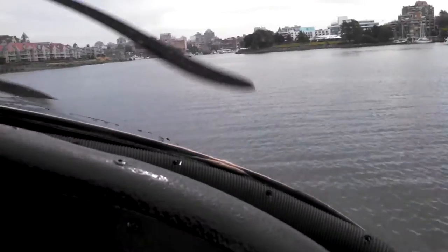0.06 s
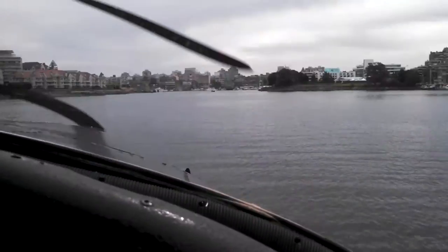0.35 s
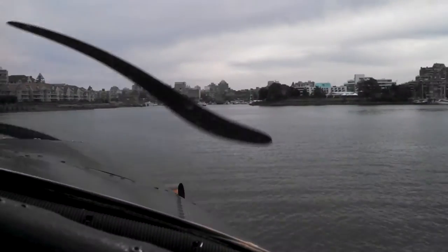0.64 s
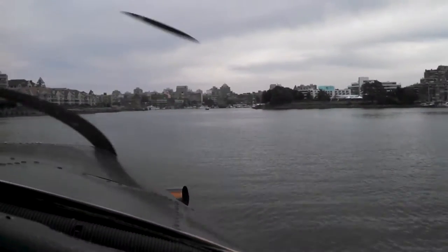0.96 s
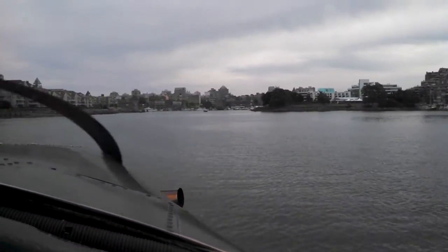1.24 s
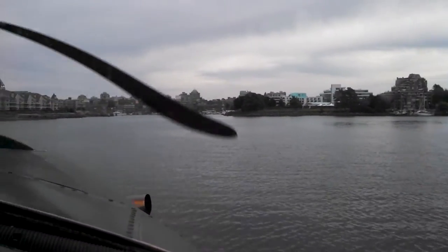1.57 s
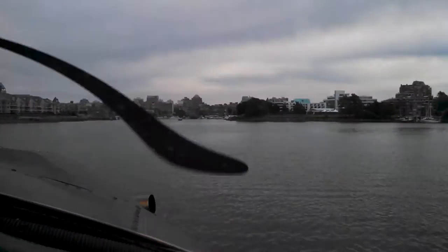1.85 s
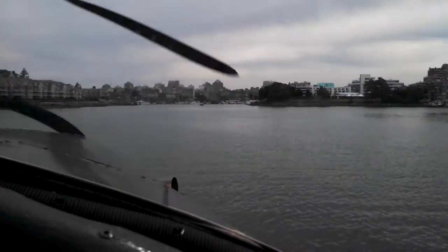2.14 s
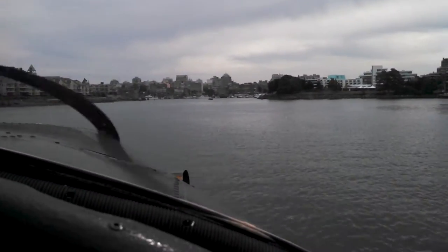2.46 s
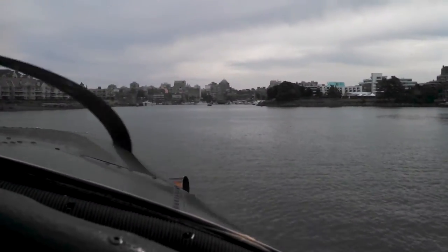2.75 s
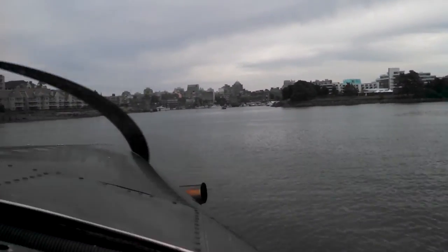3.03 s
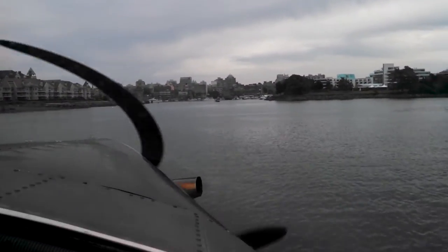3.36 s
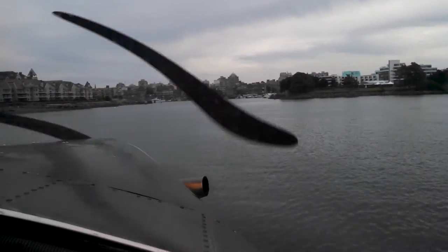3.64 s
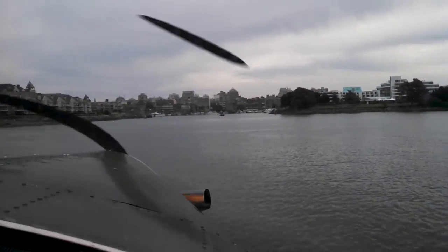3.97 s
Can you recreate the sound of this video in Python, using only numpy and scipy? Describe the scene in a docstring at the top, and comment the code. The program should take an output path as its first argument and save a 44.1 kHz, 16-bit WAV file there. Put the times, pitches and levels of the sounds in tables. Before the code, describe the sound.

A floatplane's turboprop engine drones for the whole four seconds, heard inside the cabin as a rumbling, hissing rush of air over a steady propeller hum. A high turbine whine swells and fades, sinking slightly in pitch, mostly in the first two seconds, while a lower whine slides down throughout. Thin gear tones and a faint whistle hold their pitch, with one high ring strongest just after 3 seconds.

```python
"""Inside the cabin of a turboprop floatplane taxiing on calm water.
Propeller wash rumbles on the hull, roars in the cabin and hisses past the windscreen. The governed
propeller holds its speed, so blades and gears keep their pitch, as does an instrument supply's whistle.
The turbine hums and whines as it sinks towards idle, and an accessory runs down with it.
A hand-held camera widens the picture from its two close microphone ports."""
import sys
import numpy as np
from scipy.fft import rfft, irfft, next_fast_len
from scipy.io import wavfile
from scipy.ndimage import map_coordinates

SR = 44100
rng = np.random.default_rng(int(sys.argv[2]) if len(sys.argv) > 2 else 0)


def wrap_up_sound(samples):
    """Save the sound to the file named by the first command line argument, as 16-bit audio."""
    columns = np.atleast_2d(samples).T
    # keep every value between -1 and 1, then stretch to whole-number steps
    tamed = np.clip(columns, -1, 1)
    steps = np.round(tamed * 32767).astype(np.int16)
    wavfile.write(sys.argv[1], SR, steps)


N = 176400


def amp(db):
    """Decibels to gain."""
    return 10 ** (np.asarray(db) / 20)


def unit(x):
    """x scaled to rms 1."""
    return x / np.sqrt(np.mean(x ** 2) + 1e-20)


def along(points, hz):
    """(Hz, value) points interpolated on a log frequency axis."""
    point_hz, values = np.transpose(points)
    return np.interp(np.log(hz + 1), np.log(point_hz + 1), values)


def curves(rows):
    """One value per sample for each column after the time."""
    time_s, *columns = np.transpose(rows)
    return [np.interp(np.arange(N) / SR, time_s, column) for column in columns]


def wobble(rate_hz):
    """Smooth random curve, rate_hz knots a second."""
    knots = rng.standard_normal(400)
    grid = np.arange(0, N + 64, 64)
    spline = map_coordinates(knots, [grid * rate_hz / SR], mode="wrap")
    return np.interp(np.arange(N), grid, spline)


def filtered(x, response):
    """x through a frequency response, given as a function of Hz."""
    size = next_fast_len(N + SR // 4)
    return irfft(rfft(x, size) * response(np.fft.rfftfreq(size, 1 / SR)), size)[..., :N]


def turning(hz):
    """Phase in radians of a rotation at hz."""
    return 2 * np.pi * np.cumsum(hz * np.ones(N)) / SR


def tone(hz, db, pan_db, flutter, flutter_hz=22, port_lag_s=.00008):
    """Sine fluttering independently at each port; rms db at the louder one, pan_db left over right."""
    ports = []
    for sign in (1, -1):
        phase = turning(hz) + sign * np.pi * hz * port_lag_s
        scatter = wobble(flutter_hz) * np.sin(phase) + wobble(flutter_hz) * np.cos(phase)
        ports.append(amp(min(sign * pan_db, 0)) * unit(np.sin(phase) + flutter * scatter))
    return amp(db) * np.array(ports)


# Wash spectrum. Each row: frequency in Hz, relative density in dB.
WASH_SPECTRUM_DB = [(25, -31), (36, -17), (50, -4.5), (82, -1.5), (100, -1.5), (125, 3.5), (150, -4),
                    (175, -3.5), (200, 2.5), (222, -5), (245, -3.5), (272, -6), (300, -2), (370, -6.5),
                    (500, -4.5), (590, -11.5), (700, -13), (800, -16), (1050, -18), (1300, -17),
                    (1500, -18.5), (1850, -24), (2100, -23.5), (2500, -26), (3050, -23.5), (3500, -27),
                    (4600, -29.5), (5800, -29.5), (6600, -31.5), (7600, -29), (9000, -28.5), (10000, -35.5),
                    (12000, -35.5), (13700, -29.5), (15400, -30.5)]
# Likeness of the two ports. Each row: frequency in Hz, correlation (clipped to -1..1 in use).
PORT_LIKENESS = [(40, 0.8), (130, 0.77), (300, 0.4), (800, 1.06), (1400, -1), (2000, 0), (15000, 0)]
# Port balance. Each row: frequency in Hz, left over right in dB.
PORT_BALANCE_DB = [(50, 4.5), (120, -1), (500, -2), (800, -1), (1400, 0.5), (2200, 2.5), (4800, 1.5),
                   (6200, 4), (10300, 5), (11700, 3), (13100, -5), (15000, -10)]
# Bass phase shift from cabin standing waves. Each row: frequency in Hz, left lead in radians.
PORT_LEAD_RAD = [(40, -1.8), (65, -1.9), (90, -0.42), (150, -0.84), (240, -0.27), (300, -0.022),
                 (450, 0.012)]


def wash_band(lo_hz, hi_hz):
    """One band of turbulent air noise, partly alike at the two ports, rms 1."""
    def mid_side_gains(hz):
        angle = np.arccos(np.clip(along(PORT_LIKENESS, hz), -1, 1)) / 2
        rolloff = np.sqrt((1 + (lo_hz / (hz + 1)) ** 8) * (1 + (hz / hi_hz) ** 8))
        gain = amp(along(WASH_SPECTRUM_DB, hz)) / rolloff * (hz < TOP_HZ)
        return gain * np.array([np.cos(angle), np.sin(angle)])

    def port_gains(hz):
        left = amp(along(PORT_BALANCE_DB, hz))
        right = np.exp(-1j * along(PORT_LEAD_RAD, hz))
        return np.array([left, right]) / np.hypot(left, 1)

    mid, side = filtered(rng.standard_normal((2, N)), mid_side_gains)
    return unit(filtered(np.array([mid + side, mid - side]), port_gains))


# Envelopes of the three wash bands. Each row: time in seconds, relative level in dB.
RUMBLE_DB = [(0.0, -33), (0.07, -21.5), (0.22, -32), (0.33, -23), (0.43, -28.5), (0.93, -28), (1.02, -32.5),
             (1.1, -25.5), (1.36, -28.5), (1.47, -25), (1.88, -30), (2.0, -23), (2.06, -30), (2.35, -28),
             (2.37, -26), (2.54, -30.5), (2.63, -27), (2.77, -31.5), (3.03, -25), (3.42, -29), (3.44, -24),
             (3.79, -31.5), (3.94, -26)]
ROAR_DB = [(0.0, -38), (0.03, -20.5), (0.08, -32.5), (0.6, -32), (0.63, -26), (0.85, -28.5), (1.17, -27),
           (1.27, -30.5), (1.5, -27.5), (2.72, -29), (3.16, -26.5), (3.38, -30.5), (3.44, -25.5),
           (3.53, -34.5), (3.62, -27), (4.0, -29.5)]
HISS_DB = [(0.0, -34), (0.21, -39.5), (0.33, -37), (0.51, -37.5), (0.78, -34.5), (0.8, -38), (1.09, -35.5),
           (1.48, -34.5), (1.67, -36), (2.78, -36), (2.94, -34), (3.23, -33.5), (3.3, -37), (3.43, -34),
           (3.58, -36), (4.0, -35)]
BLADE_PASS_HZ = 73.57


def wash(roar_from_hz=250, hiss_from_hz=622, chop_depth=.025):
    """Churned air: rumble on the hull, roar in the cabin, hiss chopped lightly by the blades."""
    rumble = amp(curves(RUMBLE_DB)[0] + 1.5) * wash_band(20, roar_from_hz)
    roar = amp(curves(ROAR_DB)[0] + .5) * wash_band(roar_from_hz, hiss_from_hz)
    flicker_db = .74 * wobble(24.95)
    hiss = amp(curves(HISS_DB)[0] + 6 + flicker_db) * wash_band(hiss_from_hz, SR)
    chop = 1 + chop_depth * np.sin(turning(BLADE_PASS_HZ))
    return rumble + roar + hiss * chop


# Propeller harmonics. Each row: multiple of the blade rate, level in dB.
PROPELLER_HARMONICS = [(6, -43), (7, -41), (10, -43), (12, -44.5), (13, -48), (14, -50)]


def propeller():
    """Passing blades drone at harmonics held steady by the governed speed."""
    hz = BLADE_PASS_HZ * (1 + .00044 * wobble(3.32))
    return sum(tone(multiple * hz, db, pan_db=-6, flutter=.6, flutter_hz=5)
               for multiple, db in PROPELLER_HARMONICS)


# Gearbox lines. Each row: frequency in Hz, base level in dB.
GEARBOX_LINES = [(1965, -48), (2060, -42.5), (2144, -50), (2574.8, -41.5)]
# Their envelope. Each row: time in seconds, gain in dB.
GEARBOX_GAIN_DB = [(0, -6), (1, -2), (1.5, 1), (2, -1.5), (2.9, -.5), (3.3, -6), (4, -5)]


def gearbox():
    """The reduction gearbox sings at pitches fixed by the propeller speed."""
    gain_db, = curves(GEARBOX_GAIN_DB)
    return sum(tone(hz, db + gain_db, pan_db=-16, flutter=.2, flutter_hz=8) for hz, db in GEARBOX_LINES)


# Supply harmonics. Each row: multiple of the pitch, relative level in dB.
SUPPLY_HARMONICS = [(1, 0), (2, 0), (4, -6), (5, -11)]
# Their envelope. Each row: time in seconds, level in dB.
SUPPLY_DB = [(0, -53), (.45, -53), (.6, -46), (1.1, -42.5), (1.5, -47), (2, -53), (2.85, -51), (3.15, -39),
             (3.4, -43), (4, -42.5)]


def instrument_supply(pitch_hz=1000.4):
    """The instrument supply whistles at constant pitch."""
    level_db, = curves(SUPPLY_DB)
    return sum(tone(multiple * pitch_hz, level_db + db, pan_db=-17, flutter=.25, flutter_hz=8)
               for multiple, db in SUPPLY_HARMONICS)


# Accessory whine. Each row: time in seconds, pitch in Hz, level in dB.
ACCESSORY_RUNDOWN = [(0, 1630, -41), (.33, 1599, -41.5), (.62, 1572, -51), (.85, 1551, -43.5),
                     (1.1, 1528, -43), (1.33, 1506, -48), (1.52, 1492, -37.5), (1.64, 1484, -43),
                     (1.85, 1470, -44), (2.15, 1451, -49), (2.36, 1442, -39), (2.6, 1429, -47),
                     (3.1, 1408, -44), (3.38, 1395, -51), (3.6, 1386, -36.5), (3.9, 1379, -35),
                     (4, 1376, -44)]
# Its mesh tone. Each row: time in seconds, level in dB.
MESH_DB = [(0, -60), (1.5, -46.5), (1.9, -48), (2.6, -55)]


def accessory(mesh_ratio=3.9, jitter_hz=3.5):
    """An engine accessory runs down: a falling whine, with its gear mesh tone above."""
    hz, db = curves(ACCESSORY_RUNDOWN)
    hz = hz + jitter_hz * wobble(70)
    whine = tone(hz, db, pan_db=-3.5, flutter=.33, flutter_hz=45)
    mesh = tone(mesh_ratio * hz, curves(MESH_DB)[0], pan_db=22, flutter=1)
    return whine + mesh


# Gear tone and sidebands. Each row: frequency in Hz, relative level in dB.
GEAR_PARTIALS = [(2901.6, -14), (2986, 0), (3089.4, -15)]
# Their envelope. Each row: time in seconds, level in dB.
GEAR_DB = [(0, -35.5), (.57, -41.5), (1.1, -34.5), (1.5, -34.5), (2.2, -38.5), (2.85, -37), (3, -30),
           (3.2, -27), (3.4, -32), (3.7, -33.5), (4, -39)]


def ringing_gear():
    """A gear rings at one pitch between two weaker sidebands."""
    level_db, = curves(GEAR_DB)
    return sum(tone(hz, level_db + db, pan_db=-22, flutter=.12) for hz, db in GEAR_PARTIALS)


# Turbine shaft speed. Each row: time in seconds, rotation rate in Hz.
SHAFT_HZ = [(0, 733), (.35, 717), (.6, 706.5), (1.1, 689), (1.6, 677.2), (2.1, 672), (2.9, 668.5),
            (4, 666.5)]
# Envelopes of shaft hum and blade whine. Each row: time in seconds, level in dB.
HUM_DB = [(0, -46), (.6, -41), (1.05, -33.5), (1.35, -38), (2, -34.5), (2.7, -35.5), (3.17, -31),
          (3.65, -37), (4, -35)]
WHINE_DB = [(0, -39), (.3, -42), (.78, -34), (1.07, -43), (1.32, -42), (1.4, -35), (1.53, -29), (1.68, -37),
            (1.85, -30.5), (2.07, -28), (2.25, -36), (2.45, -41), (2.6, -34), (2.97, -31), (3.2, -37),
            (3.4, -32), (3.62, -34.5), (3.87, -43), (4, -37)]


def turbine(whine_order=8, jitter=.0004, overtone_db=-10):
    """The shaft hums and its blades whine, swelling and fading, sinking together towards idle."""
    shaft_hz, = curves(SHAFT_HZ)
    hum = tone(shaft_hz, curves(HUM_DB)[0], pan_db=11.5, flutter=.12)
    whine_db, = curves(WHINE_DB)
    whine_hz = whine_order * shaft_hz * (1 + jitter * (wobble(26.4) + 2 * wobble(90)))
    whine = tone(whine_hz, whine_db, pan_db=12, flutter=.35, flutter_hz=40)
    overtone = tone(2 * whine_hz, whine_db + overtone_db, pan_db=28, flutter=1, flutter_hz=80)
    return hum + whine + overtone


def scene():
    """Everything heard from the front seat, at the left and right ports."""
    return wash() + propeller() + gearbox() + turbine() + accessory() + ringing_gear() + instrument_supply()


WIDEN_FROM_HZ, WIDEN_FULL_HZ, WIDEN_DELAY_S = 830, 1254, 16 / SR
LEFT_OVER_RIGHT_DB, TOP_HZ = -1.1, 15500


def record(dry):
    """The camera widens the treble by subtracting a delayed copy of the other port, then limits the band."""
    def crossfeed(hz):
        share = np.clip((hz - WIDEN_FROM_HZ) / (WIDEN_FULL_HZ - WIDEN_FROM_HZ), 0, 1)
        return share * np.exp(-2j * np.pi * hz * WIDEN_DELAY_S)

    wide = dry - filtered(dry[::-1], crossfeed)
    channel_gains = amp([[LEFT_OVER_RIGHT_DB / 2], [-LEFT_OVER_RIGHT_DB / 2]])
    return filtered(wide * channel_gains, lambda hz: hz < TOP_HZ)


dry = scene()
out = record(dry)
wrap_up_sound(out)
```